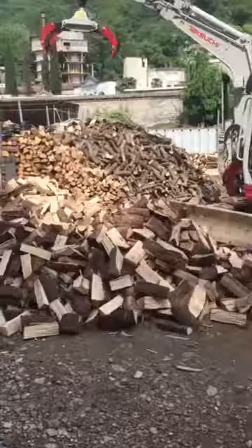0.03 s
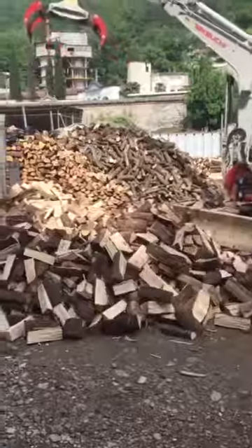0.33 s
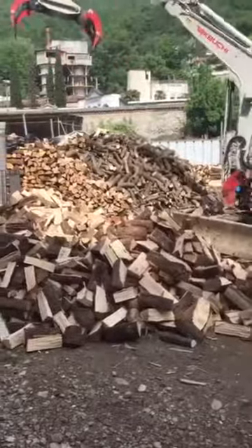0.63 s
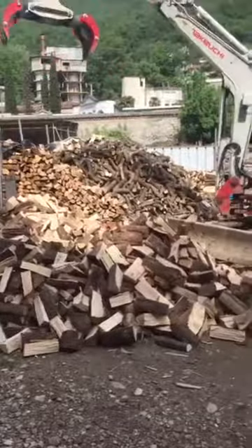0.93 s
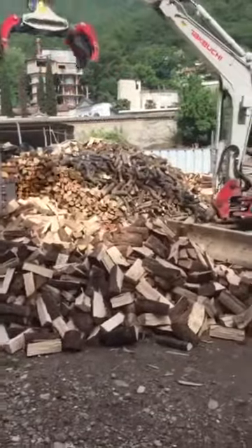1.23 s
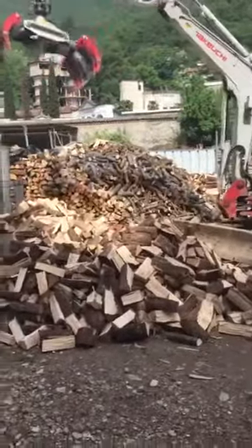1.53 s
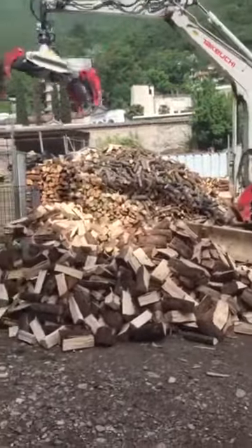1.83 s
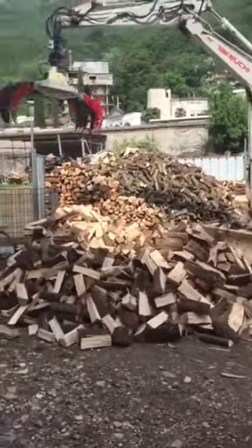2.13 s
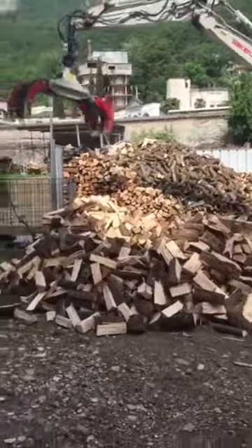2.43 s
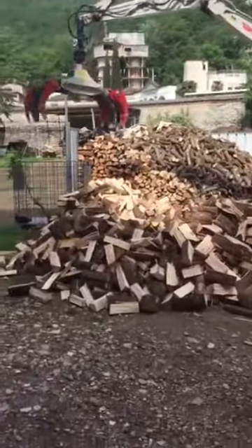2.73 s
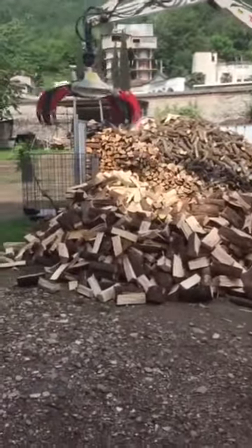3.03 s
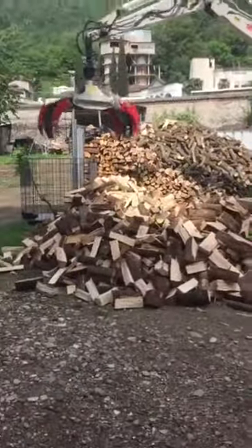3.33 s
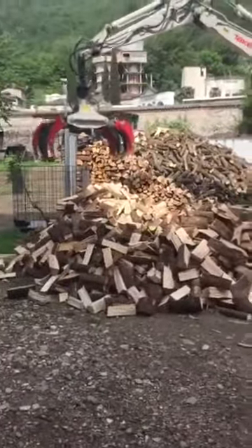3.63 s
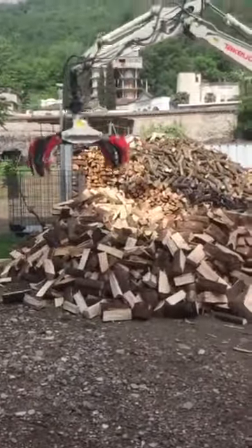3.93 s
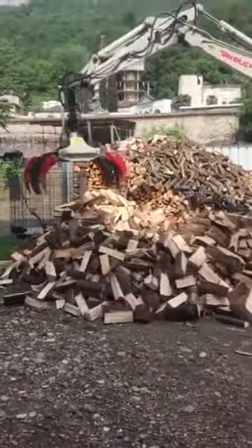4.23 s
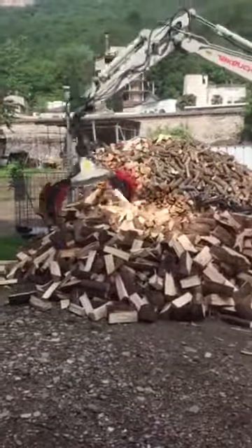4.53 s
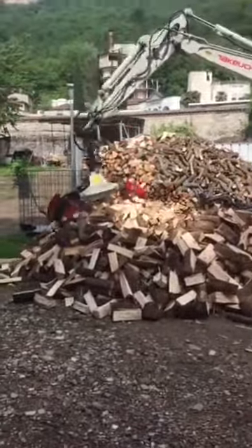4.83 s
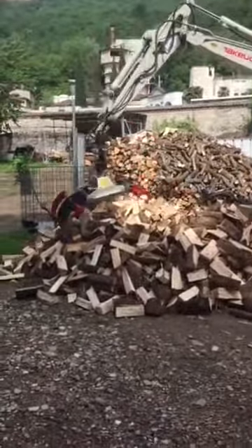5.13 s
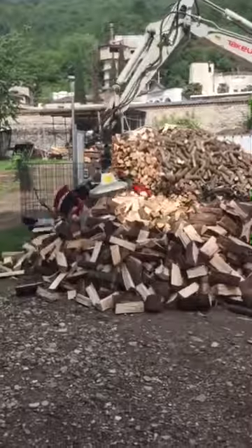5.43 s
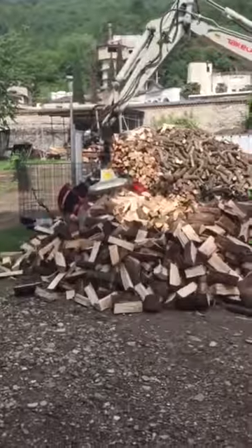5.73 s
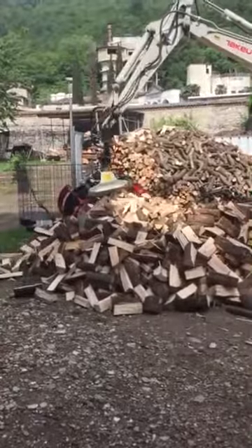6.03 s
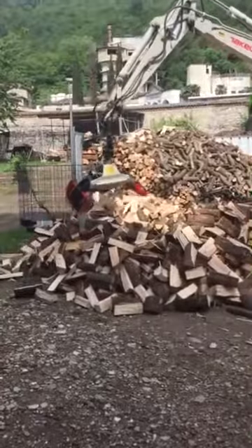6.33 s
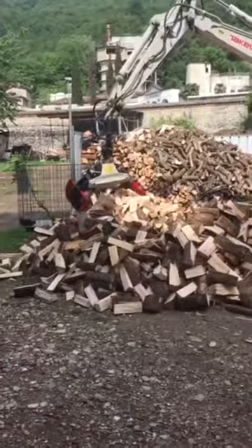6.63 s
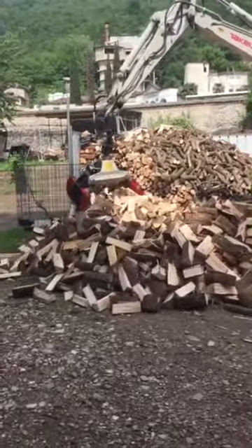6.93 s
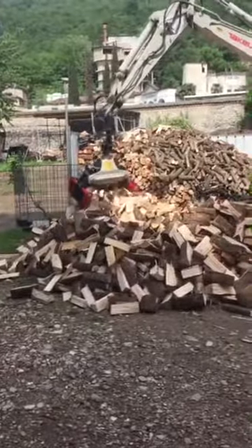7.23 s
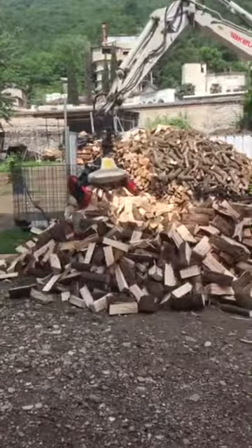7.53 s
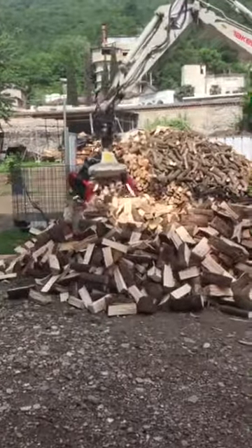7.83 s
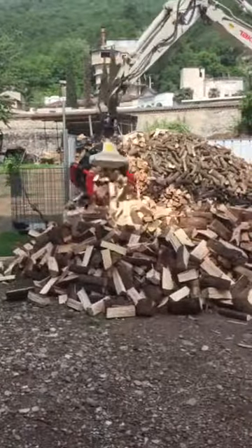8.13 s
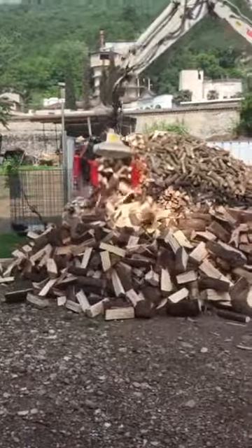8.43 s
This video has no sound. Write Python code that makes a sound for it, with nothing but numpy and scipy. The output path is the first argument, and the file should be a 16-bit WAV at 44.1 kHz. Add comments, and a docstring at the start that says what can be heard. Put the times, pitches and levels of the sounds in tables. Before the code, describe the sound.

An excavator's diesel engine drones with a hydraulic whine as its grab drops into firewood, logs clattering and steel tines clanging.

```python
"""An excavator's diesel drones throughout as its log grab swings, drops into split firewood and closes.
Exhaust, clatter and hydraulic tones follow one shaft; the pump whines louder under load.
Logs knock in their bending and twisting modes, small pieces slide, the steel tines clang.
Wood piles and yard walls scatter every blow."""
import sys
import numpy as np
from scipy import signal
from scipy.fft import rfft, irfft, next_fast_len
from scipy.io import wavfile
from scipy.ndimage import map_coordinates

SR = 44100
rng = np.random.default_rng(int(sys.argv[2]) if len(sys.argv) > 2 else 0)


def put_to_file(sound):
    """Save the sound as 16-bit audio at rate SR, in the file named by the first command-line argument."""
    columns = np.atleast_2d(sound).T  # one column per channel
    safe = np.clip(columns, -1, 1)
    whole_steps = np.round(safe * 32767)
    wavfile.write(sys.argv[1], SR, whole_steps.astype(np.int16))


N = 378819
T = np.arange(N) / SR

# firing rate, sagging under load: time_s, rate_hz
FIRING_RATE = [(0.1, 65.47), (1.75, 65.36), (2.15, 66.28), (3.0, 66.53), (3.1, 65.6), (3.7, 65.3),
               (3.85, 66.2), (4.25, 65.67), (4.55, 64.9), (5.8, 65.4), (8.55, 65.35)]
# exhaust boom, falling and partly recovering over the scene: time_s, level_db
BOOM_LEVEL = [(0.1, -25), (1.4, -26), (2.7, -30), (5.5, -30), (8.55, -28.5)]
# shaft tones: firing_multiple, relative_db
EXHAUST_ORDERS = [(2, 0)]
HOUSING_ORDERS = [(1, -3), (3, -3), (4, -10), (5, -10.5), (6, -22.5), (7, -30.5), (8, -26), (9, -27.5)]
PUMP_ORDERS = [(10, 6), (12, -5.5), (14, -5), (20, -4)]
STRAIN_ORDERS = [(5, 1), (6, -8), (7, -9.5), (8, -7.5)]
# machine noise spectra: freq_hz, density_db
CLATTER_SPECTRUM = [(15, -78), (25, -46), (49, -10.5), (76, -7), (97, -10), (110, -10.5), (135, -8),
                    (161, -5.5), (188, -6.5), (229, -9.5), (609, -24.5), (665, -20.5), (711, -19),
                    (1970, -21), (3500, -28.5), (4400, -36.5), (6500, -63.5), (11000, -120)]
TICK_SPECTRUM = [(1200, -25), (1800, 1.5), (2400, 3.5), (3000, -11.5), (3500, 5), (3900, -15), (5000, -45)]
OIL_SPECTRUM = [(3500, -39.5), (5000, -3.5), (5800, 1.5), (6500, 0), (7600, -7.5), (9500, -3.5),
                (11000, -28)]
# hydraulic strokes loading the pump: start_s, length_s, whine_db
PUMP_STROKES = [(0.75, 0.78, -39.5), (2.45, 0.49, -44), (3.007, 0.7, -40), (3.7, 0.69, -44.5)]
# oil flow through the slew valve: start_s, length_s, hiss_rise_db
SLEW_FLOW = (0.8, 1.2, 1.6)
# grab straining against the heap: start_s, length_s, level_db
GRAB_STRAINS = [(5.251, 0.52, -39.5), (5.953, 0.48, -38.5)]
# log blows: start_s, relative_db, ring_hz, relative_thud_db, relative_crack_db
LOG_KNOCKS = [(0.493, -13.5, 896, -2, -23.5), (0.497, -11.5, 2065, -10, -31), (1.311, -22, 2480, -25, -17),
              (2.237, -18.5, 1380, -9, -29), (2.344, -18.5, 2230, -21, -19), (2.52, -14, 1224, -17, -21.5),
              (2.554, -8, 2175, -7.5, -17), (2.933, -20.5, 2110, -6, -28), (4.468, -17.5, 2840, -22, -12.5),
              (4.488, -13, 2450, -14.5, -14), (4.533, -14, 2314, -22, -7.5), (4.62, -5.5, 2910, -28, -5.5),
              (4.693, -5.5, 2086, -26, -4.5), (4.735, -3, 1383, -26, -1), (4.828, -8, 2170, -29, -2),
              (4.885, -9, 2075, -13, -15), (4.896, -13, 2045, -26.5, -9), (4.932, -12.5, 1943, -17, -9),
              (4.962, -13.5, 1216, -11, -5), (5.037, -15, 1156, -9, -24), (5.148, -19.5, 1865, -16, -19),
              (5.421, -20, 715, -6, -26), (5.635, -17.5, 2190, -29, -12.5),
              (6.013, -15.5, 1265, -24.5, -32), (6.399, -22.5, 1337, -9, -5), (6.48, -19, 983, -17, -30),
              (6.693, -16, 892, -2, -26), (7.135, -17.5, 806, -3.5, -29), (7.179, -11.5, 2215, -8, -16.5),
              (7.259, -8.5, 1880, -18.5, -24.5), (7.397, -17.5, 1308, -2, -50),
              (7.502, -12.5, 1360, -19, -32), (7.634, -2, 2064, -5, -17), (7.646, -6.5, 975, -10, -13),
              (7.693, -17.5, 1970, -24, -13.5), (7.844, -21.5, 1490, -12, -16),
              (7.988, -12.5, 1855, -18.5, -19), (8.121, -19.5, 2200, -20, -15)]
# split log modes: ring_ratio, relative_db, t60_s
LOG_MODES = [(0.289, -3.5, 0.081), (.55, -11.5, 0.14), (0.738, -2.5, 0.071), (0.998, 5.5, 0.052),
             (1.27, -8.5, 0.035), (1.629, -8, 0.027), (2.199, 5, 0.053), (3.1, -3, 0.043)]
# slides in the heap: start_s, length_s, flow_db
HEAP_SLIDES = [(4.48, .12, -22), (4.626, .07, -25), (4.706, 0.049, -17.5), (4.889, .07, -28),
               (5.042, 0.034, -25), (5.174, .5, -37), (6.355, 0.21, -33.5), (7.027, 0.18, -29.5),
               (7.071, 0.015, -31), (7.27, 0.26, -42), (7.841, 0.061, -26.5), (7.945, 0.049, -27),
               (8.111, .07, -30.5)]
# wood spectra: freq_hz, density_db
KNOCK_SPECTRUM = [(120, -38), (280, 6.5), (600, 0), (1200, 2), (2300, 1), (3500, -2.5), (5600, -8.5),
                  (7000, -15), (10000, -26)]
RASP_SPECTRUM = [(150, -20), (330, 0.5), (600, -2.5), (800, -0.5), (1200, 2.5), (2400, -2.5), (4000, -9.5),
                 (6000, -15), (10000, -24.5)]
SPLINTER_SPECTRUM = [(1200, -19), (2800, 7.5), (4000, 5), (5600, -8.5), (7000, -4.5), (10000, -20.5)]
# blows on the tines: start_s, gain_db, centre_hz
TINE_BLOWS = [(2.344, -34, 4050), (2.555, -32, 5300), (4.621, -14.5, 3640), (4.694, -10.5, 5800),
              (4.737, -14, 5640), (4.768, -15, 2900), (4.831, -19, 1810), (7.179, -27, 5940),
              (7.636, -28, 5600), (7.99, -38, 4760)]
# steel tine modes: freq_hz, relative_db, t60_s
TINE_MODES = [(1780, -11, .3), (1815, -9, .35), (1968, -2, .17), (2370, -3, .18), (2762, 3.5, .2),
              (3100, -8, .18), (3538, -4.5, .4), (4415, -9, .28), (4800, -11, .28), (5200, -9, .22),
              (5450, -3, .12), (5674, -1.5, .15), (6445, -11, .3), (7680, -9, .22), (8700, -5, .17)]
# groans of the moving arm: centre_s, length_s, level_db
ARM_GROANS = [(1.712, 0.19, -39.5), (1.96, .12, -38.5), (2.31, .07, -37)]
# yard echo decay: freq_hz, t60_s
YARD_DECAY = [(200, 0.75), (2000, 0.24), (10000, 0.48)]


def diesel(phase, boom_db, noise_gain):
    """Exhaust booms, housing and fan hum; injection and valve gear rattle in step with the firings."""
    boom = amp(boom_db) * tones(phase, EXHAUST_ORDERS, flutter_db=0.03)
    housing = amp(-32) * tones(phase, HOUSING_ORDERS, flutter_db=1)
    fan = amp(-48) * tones(phase, [(15, 0)], flutter_db=2.5)
    beat = 1 + 0.063 * np.cos(phase) + 0.088 * np.cos(phase / 2)
    beat += 0.091 * np.cos(3 * phase) + 0.17 * np.cos(5 * phase)
    clatter = amp(-32.5 + 0.58 * wobble(18)) * unit(beat * noise(CLATTER_SPECTRUM))
    crank_pulse = np.exp(1.9 * np.cos(phase / 2))
    ticks = amp(-50.5) * unit(crank_pulse * noise(TICK_SPECTRUM))
    return boom + housing + fan + noise_gain * (clatter + ticks)


def hydraulics(phase, noise_gain, idle_db=-43.5):
    """The pump whines with load, the straining grab hums, oil hisses more while the arm slews."""
    load_power = sum(amp(db) ** 2 * valve(s, length_s) for s, length_s, db in PUMP_STROKES)
    whine = np.sqrt(amp(idle_db) ** 2 + load_power) * tones(phase, PUMP_ORDERS, flutter_db=1)
    effort = sum(amp(db) * valve(s, length_s) for s, length_s, db in GRAB_STRAINS)
    strain = effort * tones(phase + 0.25 * wobble(12), STRAIN_ORDERS, flutter_db=0)
    start_s, length_s, rise_db = SLEW_FLOW
    oil = unit((1 + 0.12 * np.cos(phase)) * noise(OIL_SPECTRUM))
    hiss = amp(-52.5 + rise_db * valve(start_s, length_s)) * oil
    return whine + strain + noise_gain * hiss


def valve(start_s, length_s, travel_s=0.1):
    """Valve opening, 0 to 1, with linear ramps."""
    return np.clip(0.5 + np.minimum(T - start_s, start_s + length_s - T) / travel_s, 0, 1)


def knock(ring_hz, thud_db, crack_db, scatter_db, scatter_t60_s):
    """A struck log rings briefly while its neighbours rattle and scatter the crack."""
    t = np.arange(SR // 8) / SR
    ring = sum(amp(db + rng.normal(0, 3.8) - 60 * t / t60_s)
               * np.sin(2 * np.pi * ring_hz * ratio * rng.normal(1, 0.026) * t)
               for ratio, db, t60_s in LOG_MODES)
    scatter = amp(-60 * t / scatter_t60_s) * rng.standard_normal(len(t))
    contact_s = 0.0006 / amp(crack_db / 2)  # hard contacts are quicker
    strike = (unit(ring) + amp(scatter_db) * unit(scatter)) * (1 - np.exp(-t / contact_s))
    contact_spectrum = [(300, thud_db), (800, 0.0062), (2500, 0), (5500, crack_db)]

    def colour_db(hz):
        hollow_note_db = 4 * np.exp(-(np.log2((hz + 1) / ring_hz) / 0.44) ** 2)
        return along(KNOCK_SPECTRUM, hz) + along(contact_spectrum, hz) + hollow_note_db

    return unit(coloured(strike, colour_db))


def logs():
    """Distinct knocks: hard contacts crack, heavy pieces thud."""
    out = np.zeros(N)
    for start_s, db, ring_hz, thud_db, crack_db in LOG_KNOCKS:
        blow = knock(ring_hz, thud_db + 11, crack_db + 16.5, scatter_db=11.5, scatter_t60_s=0.086)
        add(out, start_s, amp(db - 18.5) * blow)
    return out


def tumble(clacks_per_s=70, attack_s=0.0042, settle_db_per_s=127.5):
    """Small pieces break loose and settle: bark rasps, wood splinters and clacks at random."""
    flow = sum(amp(db - settle_db_per_s * np.maximum(T - s - length_s, 0))
               * np.clip((T - s) / attack_s, 0, 1) for s, length_s, db in HEAP_SLIDES)
    rasp = amp(-8 + 1.4 * wobble(90)) * flow * noise(RASP_SPECTRUM)
    splintering = (flow / amp(-22.5)) ** 2.07  # grows faster than the slide
    splinters = amp(-33 + 4.6 * wobble(160)) * splintering * noise(SPLINTER_SPECTRUM)
    out = rasp + splinters
    for slot_s in np.arange(HEAP_SLIDES[0][0], T[-1], 1 / clacks_per_s):
        start_s = slot_s + rng.uniform(0, 1 / clacks_per_s)
        ring_hz = 1950 * np.exp(rng.normal(0, 0.33))
        clack = knock(ring_hz, thud_db=2.5, crack_db=1.2, scatter_db=0, scatter_t60_s=0.17)
        add(out, start_s, np.interp(start_s, T, flow) * amp(-17.5 + rng.normal(0, 3.2)) * clack)
    return out


def tines(spread_octaves=0.41, attack_s=0.00049):
    """Each blow on the grab excites the steel modes around its own pitch."""
    out, t = np.zeros(N), np.arange(SR // 2) / SR
    for start_s, blow_db, centre_hz in TINE_BLOWS:
        ring = np.zeros(len(t))
        for hz, mode_db, t60_s in TINE_MODES:
            coupling = 1 / (1 + (np.log2(hz / centre_hz) / spread_octaves) ** 2)
            decay = amp(mode_db + rng.normal(0, 2.2) - 60 * t / t60_s)
            ring += coupling * decay * np.sin(2 * np.pi * hz * t + rng.uniform(0, 2 * np.pi))
        add(out, start_s, amp(blow_db) * ring * (1 - np.exp(-t / attack_s)))
    return out


def arm():
    """Short, rough groans as the arm swings out."""
    swell = sum(amp(db) * np.exp(-(2 * (T - s) / length_s) ** 4) for s, length_s, db in ARM_GROANS)
    return swell * noise([(250, -31), (420, -2), (520, 6), (620, -2), (900, -49), (2000, -55)])


def yard_echo(x):
    """Piles and walls return a thin, diffuse tail after 10 ms."""
    hz, t, bins = signal.stft(rng.standard_normal(SR // 2), SR, nperseg=256)
    decay = amp(-60 * t / along(YARD_DECAY, hz)[:, None])
    tail = signal.istft(bins * decay, SR, nperseg=256)[1]
    return signal.fftconvolve(np.pad(x, (SR // 100, 0)), tail / np.linalg.norm(tail))[:N]


def tones(phase, orders, flutter_db):
    """Shaft harmonics at rms 1, each fluttering alone; the housing disperses their phases."""
    return unit(sum(amp(db + flutter_db * wobble(14))
                    * np.sin(k * phase + rng.normal(np.pi / 2, np.pi / 100) * k ** 2)
                    for k, db in orders))


def noise(spectrum):
    """Coloured noise at rms 1."""
    size = next_fast_len(N + 8192)
    gain = amp(along(spectrum, np.fft.rfftfreq(size, 1 / SR)))
    return unit(irfft(rfft(rng.standard_normal(size)) * gain, size)[:N])


def coloured(x, gain_db):
    """Minimum-phase filter by gain_db(hz); attacks stay sharp."""
    size = 2 * next_fast_len(len(x))
    cepstrum = irfft(np.log(amp(gain_db(np.fft.rfftfreq(size, 1 / SR)))), size)
    cepstrum[1:size // 2] *= 2
    cepstrum[size // 2 + 1:] = 0
    return irfft(rfft(x, size) * np.exp(rfft(cepstrum)), size)[:len(x)]


def wobble(knots_per_s):
    """Smooth random curve."""
    return map_coordinates(rng.standard_normal(int(N * knots_per_s / SR) + 4), [T * knots_per_s])


def along(points, hz):
    """Interpolate (freq_hz, value) points on a log axis."""
    knots_hz, values = np.transpose(points)
    return np.interp(np.log(hz + 1), np.log(knots_hz + 1), values)


def amp(db):
    """Decibels to gain."""
    return 10 ** (np.asarray(db) / 20)


def unit(x):
    """Scale to rms 1."""
    return x / np.sqrt(np.mean(x ** 2) + 1e-20)


def add(track, start_s, x):
    """Mix x into track."""
    part = track[max(round(start_s * SR), 0):][:len(x)]
    part += x[:len(part)]


def scene():
    """The excavator and the wood it handles, mono; only the blows echo."""
    firing_hz = np.interp(T, *np.transpose(FIRING_RATE))
    phase = 2 * np.pi * np.cumsum(firing_hz) / SR + 0.039 * wobble(25)
    boom_db = np.interp(T, *np.transpose(BOOM_LEVEL))
    noise_gain = amp(0.47 * (boom_db - boom_db[0]))  # rattle and hiss fall less than the boom
    machine = diesel(phase, boom_db, noise_gain) + hydraulics(phase, noise_gain) + arm()
    blows = logs() + tumble() + tines()
    return (machine + blows + amp(-12.5) * yard_echo(blows))[None]


def record(dry):
    """Open after a short silence, duck loud crashes, round the peaks, cut the top treble."""
    open_s, fade_s, ceiling, top_hz = 0.082, 0.004, 0.85, 10700
    threshold_db, duck_share, response_s = -20.5, 0.28, 0.04
    x = dry * np.clip((T - open_s) / fade_s, 0, 1)
    step = 1 / (response_s * SR)
    rms = np.sqrt(signal.lfilter([step], [1, step - 1], x ** 2))
    x = x * np.maximum(rms / amp(threshold_db), 1) ** -duck_share
    x = x / (1 + np.abs(x / ceiling) ** 4) ** (1 / 4)
    size = next_fast_len(N + 8192)
    passband = np.fft.rfftfreq(size, 1 / SR) < top_hz
    return irfft(rfft(x, size) * passband, size)[:, :N]


dry = scene()
out = record(dry)
put_to_file(out)
```